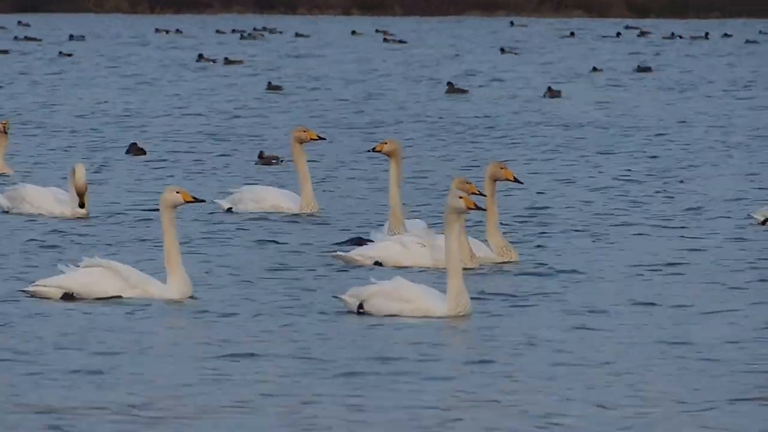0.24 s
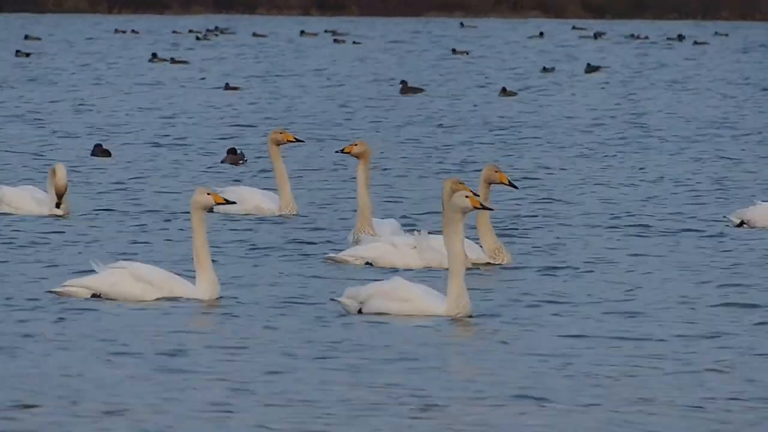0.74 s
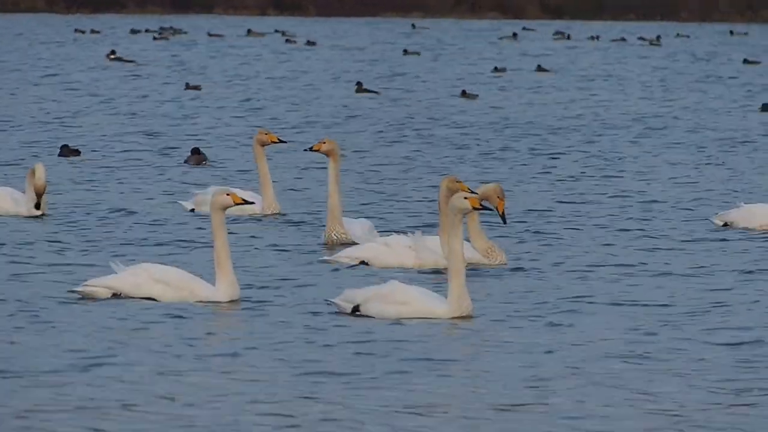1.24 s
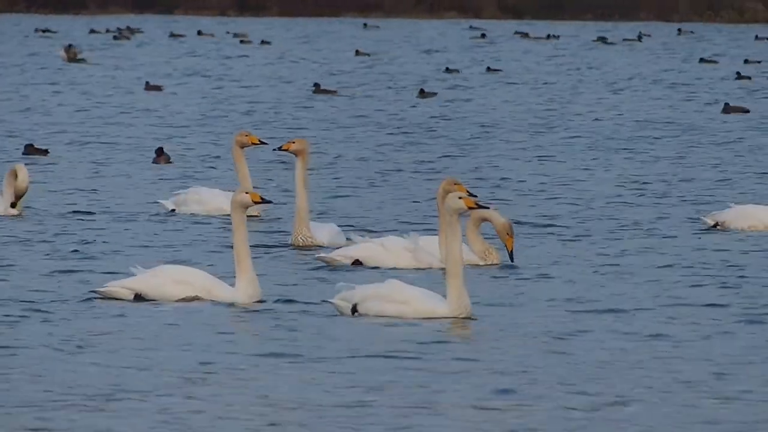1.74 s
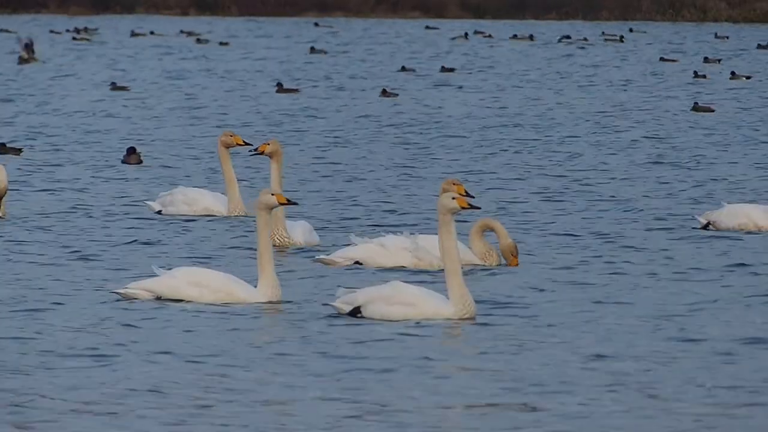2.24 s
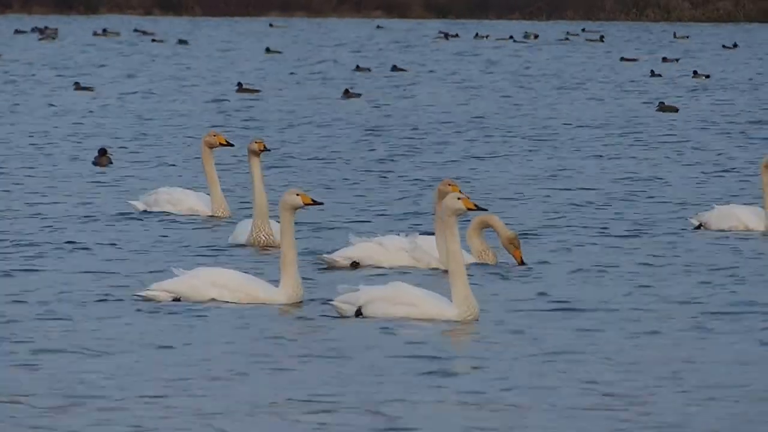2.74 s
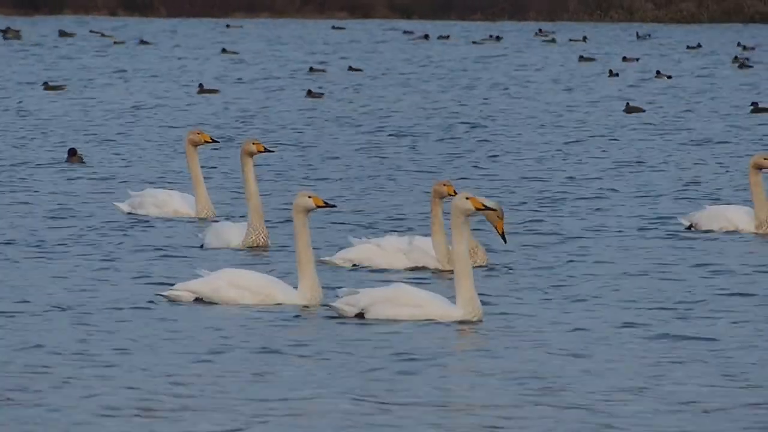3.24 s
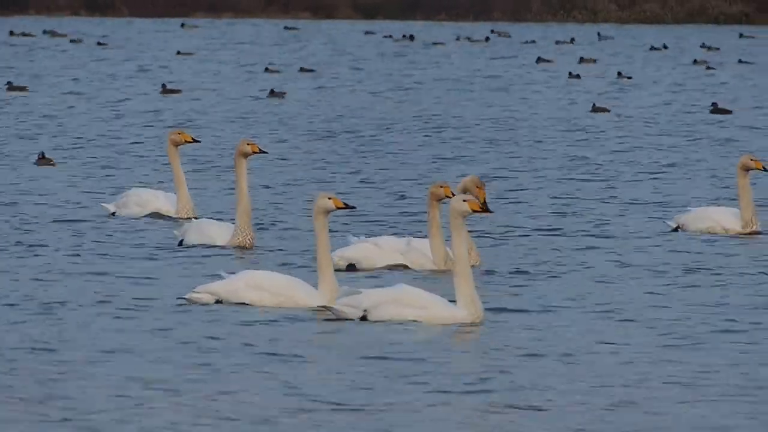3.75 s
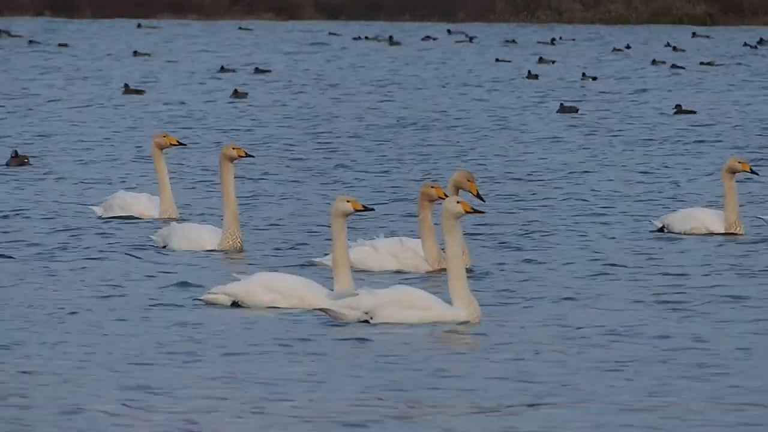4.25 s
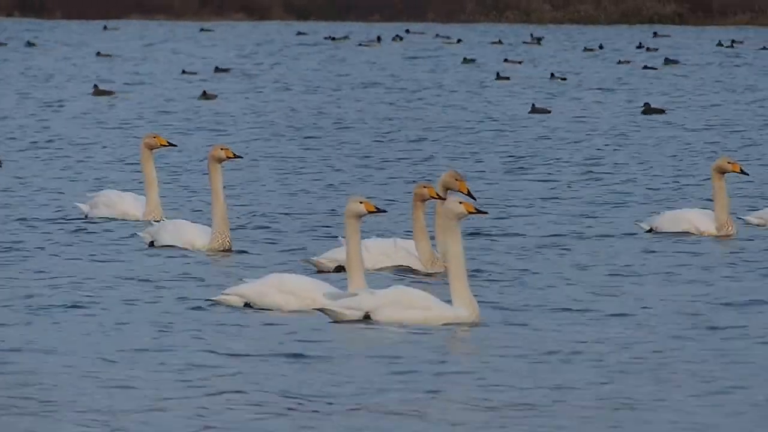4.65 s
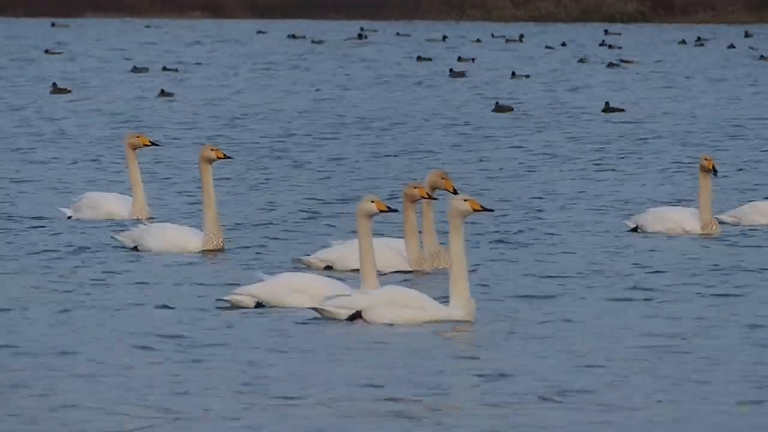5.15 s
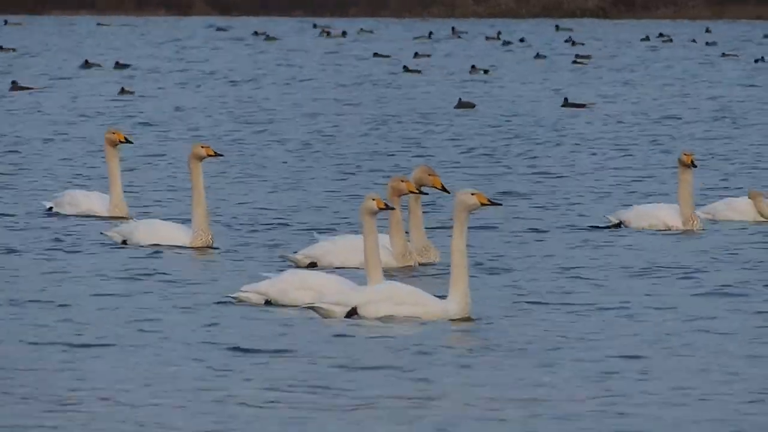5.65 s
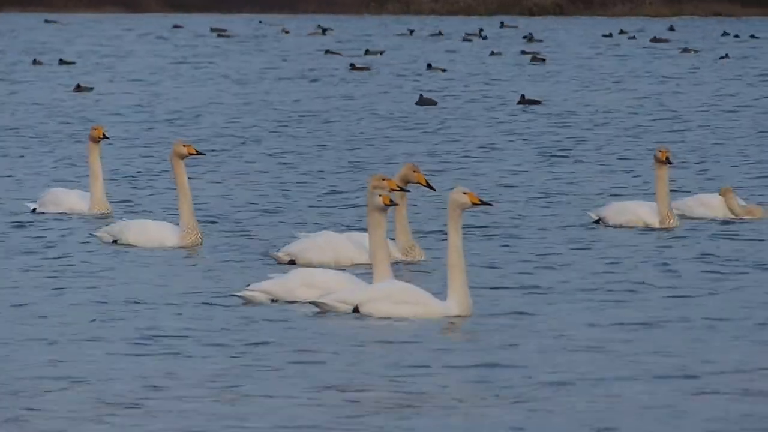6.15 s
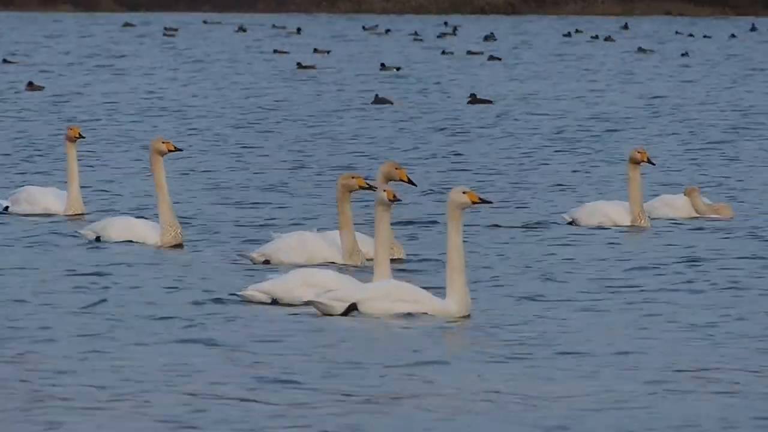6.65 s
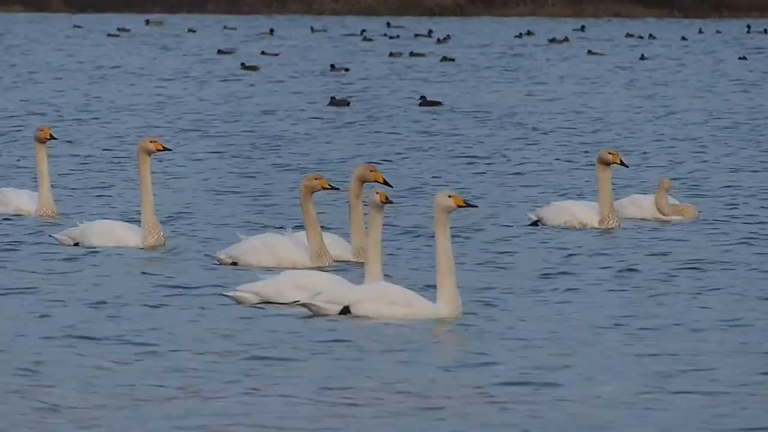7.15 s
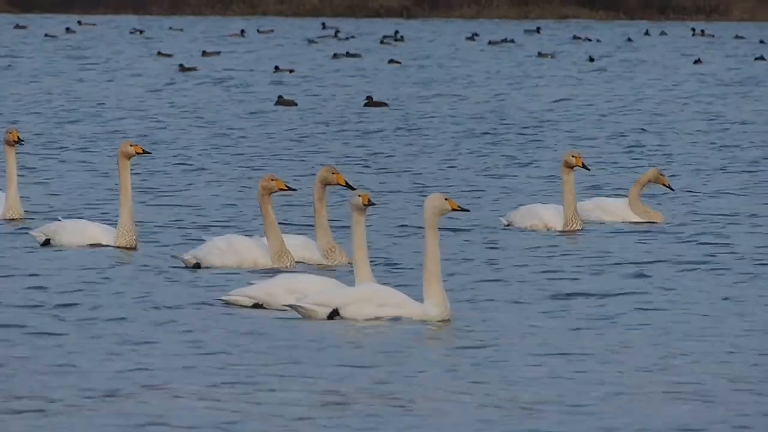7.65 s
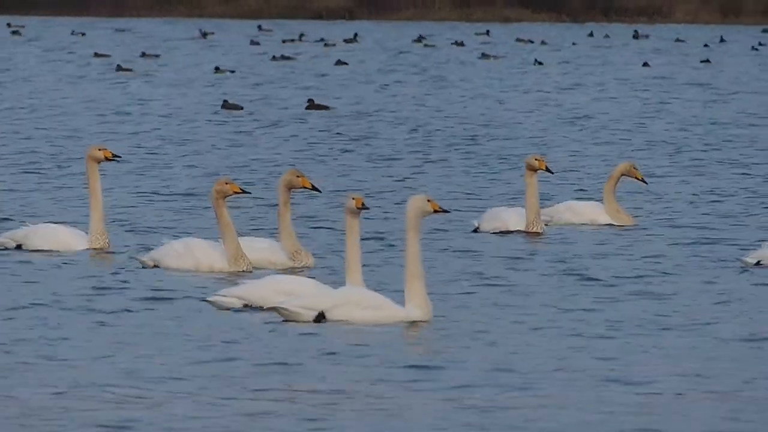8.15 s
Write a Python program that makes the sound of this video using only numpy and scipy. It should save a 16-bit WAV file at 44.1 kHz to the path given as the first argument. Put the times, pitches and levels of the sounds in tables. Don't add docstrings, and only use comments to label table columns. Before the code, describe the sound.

An open-water flock bugles in quick, overlapping toots: low brassy honks around a steady pitch, answered by brighter calls a few notes higher. Some voices crack or hiss with air. After a dense cluster the calls grow sparse, exposing breeze and soft rumbling wind, before loud closing honks. A small microphone on the shore hears the birds fairly close, with faint scattered echoes and murmuring birds far off.

```python
import sys
import numpy as np
from scipy import signal
from scipy.io import wavfile
from scipy.ndimage import uniform_filter1d

SR = 44100
rng = np.random.default_rng(int(sys.argv[2]) if len(sys.argv) > 2 else 0)


def store_pcm(level_fs):
    pcm = np.round(np.clip(level_fs, -1, 1) * 32767).astype(np.int16)
    wavfile.write(sys.argv[1], SR, np.atleast_2d(pcm).T)


def to_linear_factor(level_db):
    exponent = np.asarray(level_db, float) / 20
    return 10 ** exponent


N = 369999

HOLLOW, THIN = 0.02, 0.012
THIRDS = 0.3
SPLIT_S, SPLIT_LEFT = 0.022, 0.59
SCOOP_BEND, SAG_BEND = 2.74, 2.71
HUSK = 0.12
BANK_S, BANK_DB = 0.068, -20
AIR_DB = -48
OVERLOAD = 0.9

# (time [s], length [s], pitch [Hz], level [dB], beak band [dB])
RISING = [(0.567, 0.1, 704.4, -29, -22), (0.682, 0.12, 648.6, -30.5, -24), (1.151, 0.06, 652, -27, -24.5),
          (1.229, 0.14, 656.5, -26, -21.5), (1.657, 0.11, 670.6, -21.5, -11),
          (2.529, 0.135, 657, -27.5, -23), (3.11, 0.058, 655, -24.5, -21), (3.193, 0.15, 660.6, -29, -16),
          (3.549, 0.13, 623.7, -23, -16), (5.43, 0.13, 644, -30, -36), (5.757, 0.062, 642, -20.5, -19),
          (5.833, 0.086, 660, -24, -11), (5.882, 0.1, 620.5, -22, -22), (6.138, 0.061, 645, -19.5, -20),
          (8.141, 0.092, 645.6, -24.5, -18)]
# (time [s], length [s], pitch [Hz], level [dB], beak band [dB])
ARCHED = [
    (1.5, 0.068, 657.4, -25.5, -20.5),
    (2.26, 0.11, 643.6, -25.5, -20),
    (3.295, 0.074, 655.6, -23.5, -20),
    (6.29, 0.087, 602, -40.5, -30),
]
# (time [s], length [s], pitch [Hz], level [dB], beak band [dB])
SAGGING = [
    (1.916, 0.13, 651, -24.5, -21.5),
    (2.343, 0.11, 681, -30, -23.5),
    (6.898, 0.061, 653, -24.5, -16.5),
    (7.988, 0.088, 650, -28, -20.5),
]
# (time [s], length [s], pitch [Hz], level [dB], beak band [dB])
HELD = [
    (0, 0.059, 642.5, -22, -24.5),
    (1.81, 0.09, 655, -29, -17),
    (4.644, 0.1, 661.6, -26, -16.5),
]
# (time [s], length [s], pitch [Hz], level [dB], beak band [dB])
EVEN = [
    (3.942, 0.071, 718, -24.5, -27.5),
    (4.312, 0.1, 661, -31.5, -22),
]
# (time [s], length [s], pitch [Hz], level [dB], beak band [dB])
DEEP = [
    (1.365, 0.119, 594, -25.5, -16),
    (3.366, 0.11, 598.6, -27, -11.5),
    (6.21, 0.0808, 596.7, -25.5, -10.5),
    (8.214, 0.11, 596.5, -25.5, -10.5),
]
# (time [s], length [s], pitch [Hz], level [dB], beak band [dB])
BUGLES = [
    (1.194, 0.072, 883, -18, -13),
    (3.146, 0.064, 879, -18.5, -9),
    (6.168, 0.078, 887, -18.5, -12.5),
]
# (time [s], length [s], pitch [Hz], level [dB], beak band [dB])
WIDE = [(5.387, 0.09, 956, -25.5, -5.5)]
# (time [s], length [s], pitch [Hz], level [dB], beak band [dB])
SLIDES = [
    (1.855, 0.11, 864, -22.5, -19),
    (2.982, 0.12, 869, -20, -13.5),
]
# (time [s], length [s], pitch [Hz], level [dB], beak band [dB])
STEADY = [(0.245, 0.14, 924, -22, -14.5)]
# (time [s], length [s], pitch [Hz], level [dB], beak band [dB])
PINCHED = [(1.99, 0.087, 961, -33, -6.5)]
# (time [s], length [s], pitch [Hz], level [dB], beak band [dB])
SPLIT = [(4.002, 0.079, 968, -27.5, -8.5)]
# (time [s], length [s], pitch [Hz], level [dB], beak band [dB])
FALLING = [
    (1.745, 0.053, 895, -26.5, -9),
    (4.72, 0.063, 894, -30, -13),
    (6.882, 0.052, 869, -26, -7.5),
]
# (time [s], length [s], pitch [Hz], level [dB], beak band [dB])
SOFT = [(6.119, 0.082, 781, -27, -16.5)]
# (time [s], length [s], pitch [Hz], level [dB], beak band [dB])
DROPS = [(0, 0.051, 886, -30, -26), (0.038, 0.052, 820, -28, -12.5), (0.368, 0.0473, 923, -43.5, -4.5),
         (2.648, 0.049, 865, -38, -8), (3.45, 0.047, 797, -25.5, -34), (3.68, 0.049, 847, -21, -17),
         (4.203, 0.025, 842, -25.5, -27), (4.968, 0.099, 830, -47, -32), (5.974, 0.049, 833, -21.5, -17.5),
         (8.294, 0.065, 786, -24.5, -28), (5.918, 0.038, 876, -28.5, -1.5)]
# (time [s], length [s], pitch [Hz], level [dB], beak band [dB])
HOOTS = [(0.652, 0.032, 940, -26, -15), (1.341, 0.048, 899, -31.5, -13), (1.812, 0.071, 811, -27.5, -19),
         (2.563, 0.09, 872, -29.5, -12), (2.568, 0.044, 987, -27, -24), (3.315, 0.055, 886, -24, -12),
         (5.51, 0.074, 840, -31, -23), (6.261, 0.041, 798, -22.5, -15), (8.184, 0.15, 882, -35, -18)]
# (time [s], length [s], pitch [Hz], level [dB], beak band [dB])
LEFT_LOW = [
    (5.155, 0.125, 611, -36.5, -20),
    (5.265, 0.11, 619, -34, -16.5),
]
# (time [s], length [s], pitch [Hz], level [dB], beak band [dB])
LEFT_RISING = [
    (0.82, 0.065, 626, -29.5, -20),
    (6.815, 0.059, 632, -32, -12),
    (7.679, 0.077, 656, -31.5, -13),
]
# (time [s], length [s], pitch [Hz], level [dB], beak band [dB])
LONG = [
    (6.502, 0.089, 650, -24.5, -18.5),
    (6.575, .112, 667.8, -22.5, -11),
]
# (time [s], length [s], pitch [Hz], level [dB], beak band [dB])
LEFT_WHOOPS = [
    (0.176, 0.061, 808, -33.5, -24),
    (0.225, 0.087, 766, -31.5, -22),
    (0.627, 0.197, 792, -32.5, -24.5),
]
# (time [s], length [s], pitch [Hz], level [dB], beak band [dB])
LEFT_DROPS = [(0.87, 0.061, 815, -33.5, -20.5), (1.333, 0.054, 799, -25.5, -34),
              (5.337, 0.067, 825, -25, -27.5), (6.653, 0.0438, 880, -42.5, 7.5),
              (7.755, 0.029, 885, -32, -13)]
# (time [s], length [s], pitch [Hz], level [dB], beak band [dB])
BEHIND = [(0.236, 0.075, 655, -31.5, -37), (1.74, 0.15, 477, -47, -44), (1.994, 0.118, 461, -46, -36),
          (2.238, 0.116, 469, -47, -43), (0.17, 0.09, 557, -40, -47), (2.245, 0.06, 907, -40, -22),
          (2.265, 0.039, 788, -36, -28), (2.33, 0.05, 830, -45, -28), (2.71, 0.036, 870, -44, -20),
          (5.028, 0.026, 810, -34.5, -30), (5.185, 0.055, 796, -36, -30), (1.962, 0.039, 775, -27.5, -20),
          (8.332, 0.068, 643, -26, -26)]
# (time [s], length [s], pitch [Hz], level [dB], beak band [dB])
BRASS = [(4.1, 0.12, 592, -28.5, -2.5)]
# (time [s], length [s], pitch [Hz], level [dB], beak band [dB])
CLIMB = [(8.262, 0.092, 627, -19, -20)]
# (time [s], length [s], pitch [Hz], level [dB], beak band [dB])
LONE = [(7.298, 0.12, 898.5, -26, -16.5)]
# (time [s], length [s], pitch [Hz], level [dB], beak band [dB])
SLOW = [(5.61, 0.14, 622, -24.5, -15)]
# (time [s], length [s], pitch [Hz], level [dB], beak band [dB])
LONG_BUGLE = [(5.803, 0.12, 860, -23, -14.5)]
# (time [s], length [s], pitch [Hz], level [dB], beak band [dB])
GLIDES = [(1.275, 0.057, 793, -40, -27), (1.715, 0.047, 882, -44, -30), (2.495, 0.086, 566, -40, -24),
          (4.625, .04, 904, -45, -33), (5.108, 0.067, 990, -41, -40), (5.13, 0.043, 563, -39.5, -24),
          (3.355, 0.032, 976, -36.5, -21), (7.286, 0.026, 812, -36, -32)]
# (time [s], length [s], pitch [Hz], level [dB], beak band [dB])
DIPS = [
    (2.032, 0.141, 789, -33, -22.5),
    (2.904, 0.176, 772, -33, -33.5),
    (3.076, 0.14, 785, -36.5, -13),
]
# (time [s], length [s], pitch [Hz], level [dB], beak band [dB])
ARCS = [
    (3.215, 0.13, 790, -33, -20.5),
    (6.945, 0.115, 824, -29.5, -42),
]
# (time [s], length [s], pitch [Hz], level [dB], beak band [dB])
PAIR = [
    (2.85, .078, 607, -37.5, -37),
    (2.925, 0.081, 624.6, -30.5, -19.5),
]
# (time [s], length [s], pitch [Hz], level [dB], beak band [dB])
DYING = [(4.855, 0.15, 643, -26, -17)]
# (time [s], length [s], pitch [Hz], level [dB], beak band [dB])
LAST = [(8.031, 0.155, 870, -19.5, -11)]
# (time [s], length [s], pitch [Hz], level [dB], beak band [dB])
FLAT = [
    (6.55, 0.062, 860, -28.5, -11),
    (6.852, 0.045, 1000, -33, -16),
    (5.094, .1, 772, -29.5, -25),
    (6.737, .11, 772, -27.5, -31.5),
]

# (calls, voice), where a voice holds scoop and sag [share of pitch below the middle at start and end], rise and
# fall [s], swell_db [dB], second_db (octave) and top_db (treble) [dB], tilt_db (treble slope) [dB per octave],
# pan_db (left) [dB], gape (beak opening) [ratio], shaky (pitch shake) [share], thirds (every third beat)
KINDS = [(RISING, dict(tilt_db=-14, rise=0.03, fall=0.034, scoop=0.0636, sag=0.018, swell_db=14.5, second_db=-8, top_db=-20, pan_db=-2)),
         (ARCHED, dict(tilt_db=1, rise=0.029, fall=0.017, gape=1, scoop=0.057, sag=0.079, swell_db=-4.5, second_db=-9.5, top_db=-14, pan_db=1)),
         (SAGGING, dict(rise=0.051, fall=0.02, scoop=0.0422, sag=0.098, swell_db=1, second_db=-6, top_db=-14, pan_db=-1)),
         (HELD, dict(tilt_db=-18, rise=0.045, fall=0.022, scoop=0.0057, sag=0.0031, swell_db=2.5, second_db=-13.5, top_db=-19.5, pan_db=-4)),
         (DEEP, dict(tilt_db=-10, rise=0.025, fall=0.034, scoop=-0.011, sag=0.046, swell_db=-1.5, second_db=-5.5, top_db=-15.5, pan_db=2)),
         (BUGLES, dict(tilt_db=8, thirds=0.11, rise=.025, fall=0.014, scoop=0.0345, sag=0.074, swell_db=1.5, second_db=-16, top_db=-6, pan_db=2.1)),
         (WIDE, dict(tilt_db=-10, rise=0.039, fall=0.018, scoop=0.015, sag=0.056, swell_db=-4, second_db=-9, top_db=-11, pan_db=4, gape=1.11)),
         (SLIDES, dict(tilt_db=5, thirds=0.14, rise=0.057, fall=0.023, gape=0.97, scoop=-0.0029, sag=0.053, swell_db=-5, second_db=-16, top_db=-7, pan_db=1.4)),
         (STEADY, dict(rise=0.063, fall=0.029, gape=0.97, scoop=0.0347, sag=0.055, swell_db=-2.5, second_db=-22.5, top_db=-19.5, pan_db=-1)),
         (PINCHED, dict(gape=1.13, tilt_db=-14, scoop=0.022, sag=0.067, swell_db=4, second_db=0.5, top_db=-9.5, pan_db=3.5)),
         (SPLIT, dict(rise=0.025, fall=0.042, gape=1.05, scoop=0.0079, sag=0.02, swell_db=-10.5, second_db=-17.5, top_db=-18.5, pan_db=1.5, thirds=THIRDS)),
         (FALLING, dict(rise=0.03, fall=0.024, scoop=-0.022, sag=0.1, swell_db=11, second_db=-19.5, top_db=-15.5, pan_db=-1.5, shaky=0.0089)),
         (SOFT, dict(gape=0.67, scoop=0.038, sag=0.083, swell_db=-1.5, second_db=-19, top_db=-16, pan_db=4)),
         (DROPS, dict(rise=0.026, fall=0.023, scoop=-0.048, sag=0.091, swell_db=1, second_db=-27.5, top_db=-18, pan_db=1.5, shaky=HOLLOW)),
         (HOOTS, dict(tilt_db=2, rise=0.034, fall=0.021, scoop=0.0334, sag=0.074, swell_db=12, second_db=-21, top_db=-17.5, pan_db=1.5, shaky=THIN)),
         (LEFT_LOW, dict(rise=0.026, fall=0.015, gape=0.83, scoop=-0.012, sag=0.039, swell_db=-5, second_db=-8, top_db=-16, pan_db=5.5)),
    (LEFT_RISING, dict(gape=1, scoop=0.069, sag=-0.0088, swell_db=6, second_db=-11, top_db=-23, pan_db=4)),
    (LONG, dict(tilt_db=-16.5, rise=0.034, fall=0.018, scoop=0.0344, sag=0.012, swell_db=0, second_db=-12, top_db=-12, pan_db=-2.5)),
    (LEFT_WHOOPS, dict(scoop=-0.013, sag=-0.0067, swell_db=6.5, second_db=-25.5, top_db=-9.5, pan_db=4.5, shaky=THIN)),
    (LEFT_DROPS, dict(scoop=-0.025, sag=0.092, swell_db=8, second_db=-23.5, top_db=-10, pan_db=4.5, shaky=HOLLOW)),
    (BEHIND, dict(rise=0.014, fall=0.015, scoop=-0.027, sag=0.061, swell_db=-1.5, second_db=-17, top_db=-14, pan_db=3.5)),
         (BRASS, dict(scoop=0.034, sag=0.04, swell_db=-6.5, second_db=-3.5, top_db=-19.5, pan_db=1.8, gape=0.94, rise=0.044, fall=0.02, tilt_db=-19)),
              (CLIMB, dict(scoop=.03, sag=-0.01, swell_db=0, second_db=-12.5, top_db=-12, pan_db=1, rise=0.037, fall=0.018, tilt_db=-28)),
              (LONE, dict(scoop=0.0, sag=0.06, swell_db=-10, second_db=-12.5, top_db=-10, pan_db=3.5, thirds=0.28, shaky=0.00091, rise=0.032, fall=0.041, tilt_db=-6)),
              (SLOW, dict(scoop=.07, sag=0.054, swell_db=9.5, second_db=-5, top_db=-10, pan_db=3, rise=0.04, fall=0.081, tilt_db=1)),
              (LONG_BUGLE, dict(scoop=-0.0084, sag=.06, swell_db=5, second_db=-12.5, top_db=-12, pan_db=3, thirds=0.34, rise=0.014, fall=0.034, tilt_db=14)),
              (GLIDES, dict(scoop=0.072, sag=-.07, swell_db=12.5, second_db=-14, top_db=-18, pan_db=7.5, rise=0.011, fall=0.014)),
              (DIPS, dict(scoop=-0.0507, sag=-0.069, swell_db=-3.5, second_db=-22, top_db=-10, pan_db=5.5, shaky=0.0072, rise=0.018, fall=0.023)),
              (ARCS, dict(scoop=0.0524, sag=0.039, swell_db=-2.5, second_db=-27.5, top_db=-9.5, pan_db=6, shaky=0.016, rise=0.036, fall=0.031)),
              (PAIR, dict(gape=0.78, scoop=0.042, sag=-0.0044, swell_db=-2, second_db=-3, top_db=-6, pan_db=3, rise=0.04, fall=0.023)),
              (DYING, dict(tilt_db=6, scoop=.1, sag=0.045, swell_db=6.5, second_db=-5.5, top_db=-10, pan_db=1.5, rise=0.056, fall=0.067)),
              (LAST, dict(tilt_db=5.5, gape=1, scoop=-0.013, sag=0.0624, swell_db=0, second_db=-12, top_db=-10.5, pan_db=1.3, thirds=0.4, rise=0.058, fall=0.024)),
              (FLAT, dict(gape=0.87, scoop=-0.0033, sag=0.046, swell_db=2.5, second_db=-20, top_db=-14, pan_db=5.5, rise=0.012, fall=0.016))]
EVEN_KIND = (EVEN, dict(tilt_db=-8, rise=0.03, fall=0.029, scoop=0.078, sag=0.015, swell_db=7.5, second_db=-10.5, top_db=-20, pan_db=-1))
# (time [s], octave [dB], third partial [dB], beak opening [ratio], top band [dB])
MANNERS = [(0.245, 0, -1, 0.95, -0.5), (0.567, -6, 0, 1.01, -4), (0.682, -1.5, 3, 0.97, 0),
           (1.194, -1, -3, 0.99, -0.5), (1.365, -2, -3, 1.005, 3), (1.657, 1.5, -1.5, 1.035, -9.5),
           (1.916, -3, 7, 0.97, 9), (2.26, -5.5, 3, 0.94, -1), (2.982, -5, -1.5, 0.95, -6),
           (3.146, 0, -0.5, 1.034, -2.5), (3.295, 0.5, -1, 1.01, 0), (3.366, 1, 0.5, 1.01, 4),
           (3.549, -1, -1.5, 1.14, 2), (3.945, -1.5, -4, 1.1, -3), (4.002, -2, -6.5, 0.93, -6),
           (4.1, 1, 6.5, 1.09, 1), (4.31, 5, 1, 1.05, -2), (4.644, 2, 0, 1.03, 5.5),
           (4.855, 1.5, 4, 0.89, 3), (5.387, -1, -6.5, 0.944, 0.5), (5.61, 2.5, 2, 1.025, 0.5),
           (5.882, -1.5, 0.5, 1.08, 8), (6.168, 2, 4.5, 1.01, 1), (6.21, -0.5, 2.5, 1.18, 5),
           (6.502, 2.5, -2.5, 1, 3), (6.575, 3.5, 0.5, 1.085, -2.5), (6.737, -1, -8, 1.06, -2),
           (7.298, -3, 11, 1.13, -7), (7.679, 4.5, 0.5, 0.87, -5), (8.031, 0, 5.5, 1.03, -1),
           (8.262, 0, -4, 1.05, 0.5), (5.265, -1, -4, 0.98, -3), (5.155, 3.5, 1, 1, 2),
           (2.529, -4.5, -2, 1.1, -2), (1.229, -2, -2, 0.95, 0), (3.193, 1.5, 0.5, 0.97, 5),
           (5.094, 2, 2, 1, -5), (5.803, 1.5, 9, 1, 1), (1.855, 0, 1, 1.01, -2)]
# (frequency [Hz], level [dB])
BEAK = [(2200, -26), (2450, -9.5), (2650, -4.5), (3650, -1.5), (4300, -6), (5200, -19), (5900, -6),
        (7200, -7), (10500, -15.5), (15000, -45)]
# (time [s], length [s], level [dB])
RASPS = [(0.05, 0.042, -54), (2.24, 0.046, -62.5), (5.155, 0.041, -59.5), (5.52, 0.044, -52.5),
         (4.635, 0.025, -65), (0.861, 0.038, -56), (3.452, 0.026, -48), (4.956, 0.055, -55.5),
         (7.75, 0.028, -65), (0.656, 0.017, -61), (1.197, 0.021, -40.5), (1.358, 0.06, -49.5),
         (1.754, 0.021, -42), (1.83, 0.06, -45.5), (2.555, 0.07, -52), (2.985, 0.04, -46.5),
         (3.15, 0.021, -39.5), (3.309, 0.093, -49.5), (3.662, 0.038, -45.5), (4.203, 0.031, -54),
         (4.727, 0.048, -52), (5.387, 0.034, -50), (5.806, 0.057, -42), (5.963, 0.055, -49.5),
         (6.176, 0.065, -39.5), (6.575, 0.05, -51), (6.665, 0.027, -43), (6.853, 0.07, -46.5),
         (8.038, 0.06, -43), (8.212, 0.057, -46.5)]
# (frequency [Hz], width [Hz], level [dB])
PIPE = [(835, 136, 15), (1356, 550, 4.5), (2654, 460, 2), (3840, 1300, 5.5)]
# (time [s], half length [s], centre [Hz], level [dB])
HISSES = [(1.208, .018, 10000, -50), (1.216, 0.023, 7000, -49), (1.395, .02, 11500, -57),
          (4.02, .015, 6500, -57), (4.751, .02, 7000, -51), (5.408, .015, 8200, -46),
          (5.835, .02, 7300, -48), (5.865, 0.028, 9500, -47), (6.202, .018, 8000, -41),
          (6.205, .02, 11300, -53), (7.345, .02, 9600, -58), (6.887, 0.031, 8600, -52),
          (8.094, 0.035, 7040, -42), (8.12, 0.039, 9800, -48), (3.398, .02, 7200, -55)]
# (frequency [Hz], density [dB per Hz])
AIR = [(25, -16.5), (70, -19.5), (180, -9), (850, 1), (1900, -16.5), (10000, -26), (15500, -33.5)]
# (frequency [Hz], likeness [-1 to 1])
SAME = [(25, .8), (60, 0.52), (150, 0.86), (250, 0.16), (350, -0.39), (500, -0.15), (750, 0.4)]
# (time [s], half length [s], level [dB])
GUSTS = [(1.2, 0.065, -57), (2.3, .07, -52), (2.462, 0.059, -45), (3.46, 0.027, -42), (3.594, 0.044, -53),
         (3.795, 0.054, -54), (5.473, 0.1, -44.5), (5.7, 0.12, -50), (6.466, 0.047, -48), (6.824, 0.1, -50),
         (7.144, 0.1, -39), (7.722, 0.053, -39), (8.13, 0.06, -41.5)]


def flock():
    mix = np.zeros((2, N))
    for rows, voice in KINDS + [EVEN_KIND]:
        for row in rows:
            add(mix, *call(*row, **voice))
    for s, length, db in RASPS:
        add(mix, s - length / 4, rasp(length, db), 0)
    return mix


def call(s, length, hz, db, beak_db, scoop, sag, swell_db, second_db, top_db, pan_db,
         thirds=0, shaky=0, gape=1, rise=0.024, fall=0.018, tilt_db=0):
    own = [row[1:] for row in MANNERS if abs(row[0] - s) < 0.0055]
    octave_db, third_db, opening, high_db = own[0] if own else (0, 0, 1, 0)
    if s < 0.01:
        rise = 1e-4
    sound = honk(length, hz * (1 - scoop), hz, hz * (1 - sag), db, swell_db, second_db + octave_db,
                 beak_db, beak_db + top_db + high_db, thirds, shaky, gape * opening,
                 rise, fall, tilt_db, third_db)
    return s, sound, pan_db


def honk(length, start_hz, mid_hz, end_hz, db, swell_db, second_db, beak_db, top_db, thirds=0, shaky=0,
         gape=1, rise=0.027, fall=0.018, tilt_db=0, third_db=0):
    u = np.linspace(0, 1, round(length * SR), dtype=np.float32)
    bend = (start_hz - mid_hz) * (1 - u) ** SCOOP_BEND + (end_hz - mid_hz) * u ** SAG_BEND
    hz = mid_hz + bend - bend[len(u) // 2]
    breath = np.clip(np.minimum(u / rise, (1 - u) / fall) * length, 1e-4, 1)

    shake = 0.004 + 0.02 * (1 - breath) + shaky
    turns = np.cumsum(hz * (1 + shake * wobble(len(u), size=200))) / SR
    every_third = np.cos(2 * np.pi * turns / 3)

    k = np.arange(1, 25)
    scatter, phase, start, speed = rng.random((4, len(k)))
    beak_hz = k * mid_hz / gape
    treble_db = top_db + tilt_db * np.log2(k * mid_hz / 8000)
    partial_db = read(BEAK, beak_hz) + np.where(beak_hz < 5300, beak_db, treble_db)
    partial_db += 5.6 * (scatter - 0.5)
    partial_db[:2] = 0, second_db
    if mid_hz < 730:
        partial_db[2] = 0.26 * second_db + 0.25 * beak_db - 14.5
    partial_db[2] += third_db
    heard = (k * hz.max() < 15500) & (partial_db + db > -85)
    k, partial_db, phase, start, speed = np.float32([k, partial_db, phase, start, speed])[:, heard, None]

    flutter = 0.15 * np.minimum(k - 0.7, 4) * np.cos(2 * np.pi * (start + 22 * speed * length * u))
    size = to_linear_factor(partial_db) * np.exp(flutter + (0.38 + 0.11 * k) * np.log(breath))
    waves = np.sin(2 * np.pi * ((k * turns + phase / 1.61) % 1).astype(np.float32))

    hoarse = 1 + 0.024 * wobble(len(u), size=60)
    settling = SPLIT_LEFT + np.exp(-u * length / SPLIT_S)
    size = size * (1 + thirds * np.minimum(k, 5) / 2 * settling * every_third)
    size = size * (1 + HUSK * np.clip(k * mid_hz / 4000 - 1.1, 0, 1) * wobble(len(u), size=24))
    return np.sqrt(2) * to_linear_factor(db + swell_db * (u - 0.5)) * hoarse * (size * waves).sum(0)


def rasp(length, db):
    n = round(1.58 * length * SR)
    pulse_hz = 218 * (np.linspace(1.03, 0.95, n) + 0.025 * wobble(n, size=200))
    turns = np.cumsum(pulse_hz) / SR
    pulses = np.diff(np.floor(turns), prepend=0) * (0.46 + 0.19 * wobble(n, size=1))
    puffs = np.exp(-(turns % 1)) * wobble(n, size=1)
    drive = evened(pulses) + 0.6 * evened(puffs)
    drive = signal.lfilter(*signal.butter(2, 450, "high", fs=SR), drive)
    pipe = np.zeros(n)
    for k, (hz, width, gain_db) in enumerate(PIPE):
        ringing = ring(ring(drive, hz, 2 * width), hz, width)
        pipe += (-1) ** k * to_linear_factor(gain_db) * evened(ringing)
    fizz = evened(signal.lfilter(*signal.butter(2, [5500, 11000], "band", fs=SR), puffs))
    return to_linear_factor(db) * (pipe + to_linear_factor(-30) * fizz) * np.hanning(n)


def hisses():
    mix = np.zeros((2, N))
    t = np.arange(-0.08, 0.08, 1 / SR)
    for s, half, hz, db in HISSES:
        middle, side = [evened(ring(ring(wobble(len(t), size=1), hz, 2600), hz, 2600)) for _ in range(2)]
        puff = np.array([middle + 0.35 * side, middle - 0.35 * side])
        add(mix, s + t[0], to_linear_factor(db) * np.exp(-(t / half) ** 2) * puff, 0)
    return mix


def far_bank(birds):
    thin = signal.lfilter(*signal.butter(1, 2500, "high", fs=SR), birds)
    late = np.pad(thin, ((0, 0), (round(BANK_S * SR), 0)))[:, :N]
    return late * to_linear_factor(BANK_DB + np.array([[1.5], [-1.5]]))


def shore(x, t60=0.33, delay=0.03):
    t = np.arange(SR // 3) / SR
    sparse = rng.random((3, len(t))) < 0.03
    taps = rng.standard_normal((3, len(t))) * sparse * to_linear_factor(-60 * t / t60) * (t > delay)
    taps = signal.lfilter([1], [1, -0.55], taps[0] + 0.58 * taps[1:])
    return signal.oaconvolve(x, taps / np.linalg.norm(taps[0]), axes=1)[:, :N]


def far_birds(count=60):
    mix = np.zeros((2, N))
    for when, pitch, stretch, loudness, side in rng.random((count, 5)):
        hz, db = 460 + 480 * pitch, -57 + 8 * loudness
        sound = honk(0.064 * (1 + stretch), 0.97 * hz, hz, 0.955 * hz, db, 0, -14, -34, -60)
        add(mix, when * N / SR, sound, 12 * (side - 0.5))
    return mix


def breeze():
    frames, hz = N // 256 + 5, np.fft.rfftfreq(1024, 1 / SR)
    a, b, c, d, patches = rng.standard_normal((frames, 513, 5)).T
    patches = evened(uniform_filter1d(uniform_filter1d(patches, 10, 0), 12, 1))
    gusts = evened(uniform_filter1d(rng.standard_normal(frames), 14)) * (hz[:, None] < 400)
    same = np.clip(read(SAME, hz), -1, 1)[:, None]
    left = a + 1j * b
    right = same * left + np.sqrt(1 - same ** 2) * (c + 1j * d)
    z = np.array([left, right])
    z *= to_linear_factor(read(AIR, hz)[:, None] + 2.0 * patches + 0.65 * gusts)
    return to_linear_factor(AIR_DB) * evened(signal.istft(z, nperseg=1024, noverlap=768)[1][:, :N])


def buffets():
    t = np.arange(N) / SR
    level = sum(to_linear_factor(db) * np.exp(-((t - s) / half) ** 2) for s, half, db in GUSTS)
    slow = uniform_filter1d(uniform_filter1d(rng.standard_normal(N), 700), 700)
    lumps = to_linear_factor(6.0 * evened(slow))
    low = ring(ring(ring(rng.standard_normal(N), 204, 260), 190, 300), 176, 296)
    return level * evened(low * lumps) * np.array([[1], [-0.6]])


def ring(x, hz, width):
    return signal.lfilter(*signal.iirpeak(hz, hz / width, SR), x)


def wobble(n, size):
    return evened(uniform_filter1d(rng.standard_normal(10000), size))[:n]


def evened(x):
    return x / np.sqrt(np.mean(x ** 2) + 1e-20)


def read(points, hz):
    f, value = np.transpose(points)
    return np.interp(np.log(hz + 1), np.log(f + 1), value)


def add(mix, s, sound, pan_db):
    part = mix[:, max(round(s * SR), 0):][:, :sound.shape[-1]]
    part += sound[..., :part.shape[1]] * to_linear_factor(np.array([[pan_db / 2], [-pan_db / 2]]))


def scene():
    no_rumble = signal.butter(4, 380, "high", fs=SR, output="sos")
    birds = signal.sosfilt(no_rumble, flock() + hisses())
    echoes = far_bank(birds) + to_linear_factor(-17) * shore(birds)
    return birds + echoes + far_birds() + breeze() + buffets()


def band_limit(x):
    return signal.sosfilt(signal.butter(12, 15610, fs=SR, output="sos"), x)


def record(dry):
    bent = OVERLOAD * np.tanh(dry / OVERLOAD)
    finished = bent - 0.007
    return band_limit(finished)


dry = scene()
out = record(dry)
store_pcm(out)
```